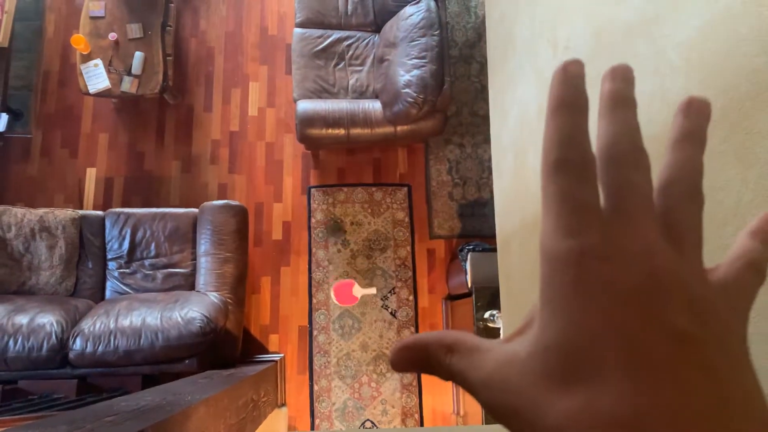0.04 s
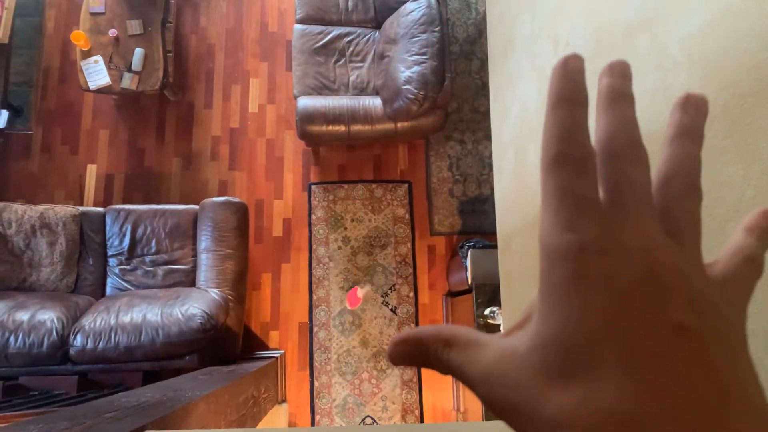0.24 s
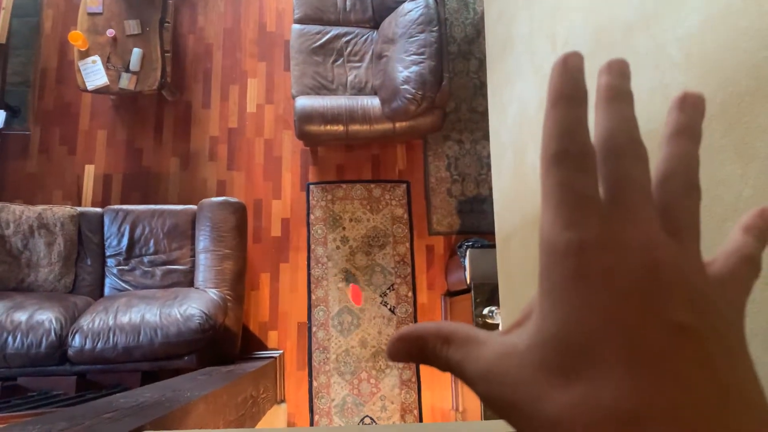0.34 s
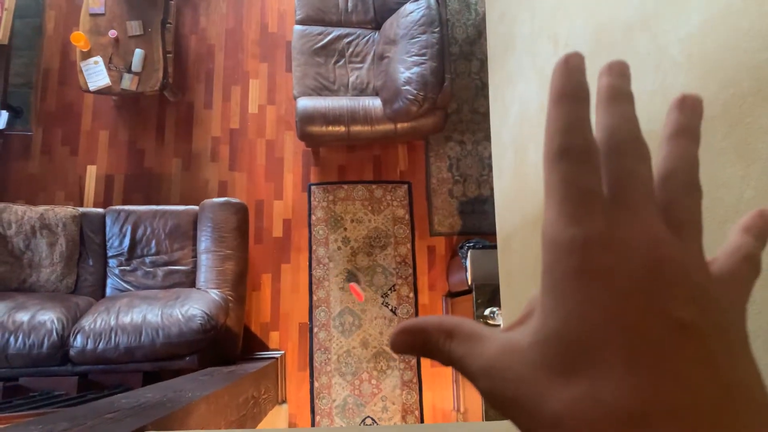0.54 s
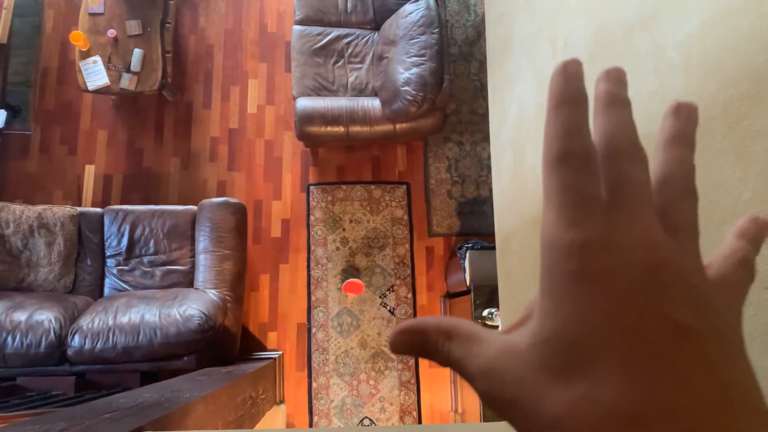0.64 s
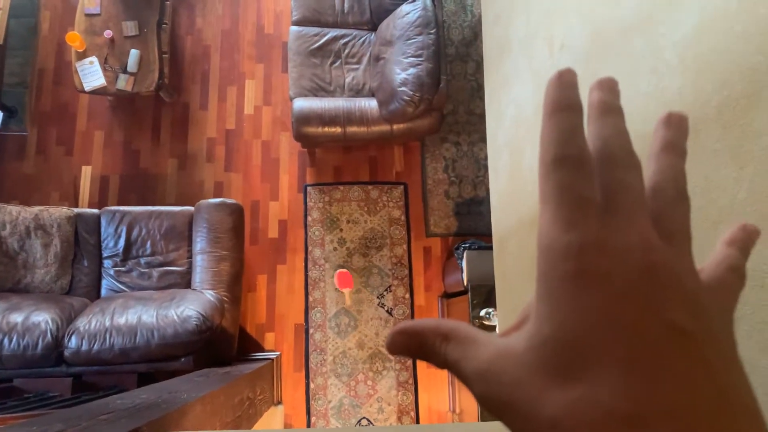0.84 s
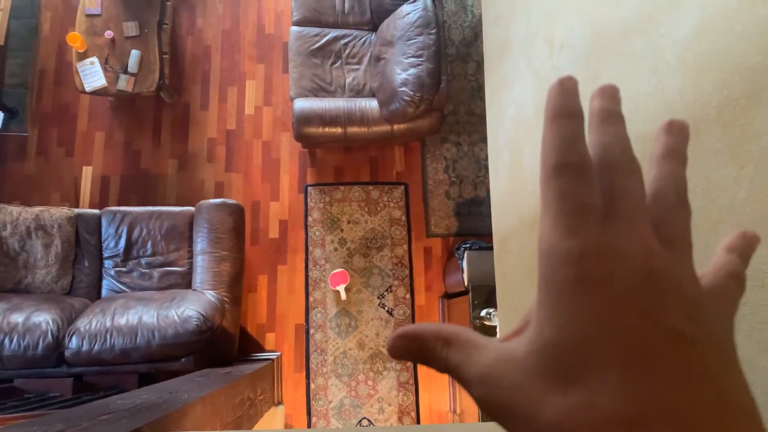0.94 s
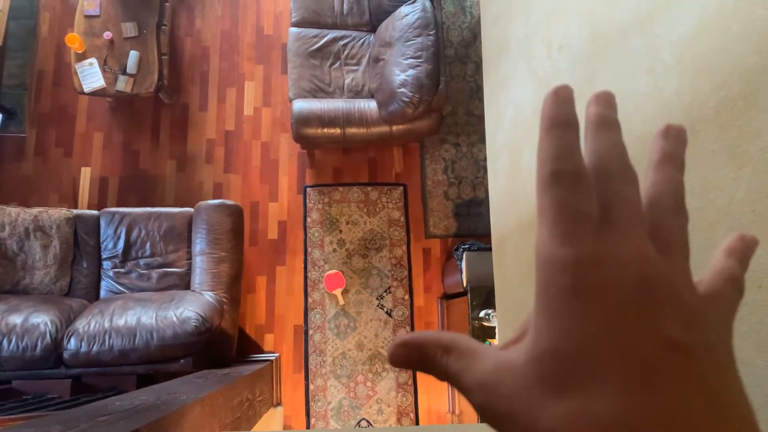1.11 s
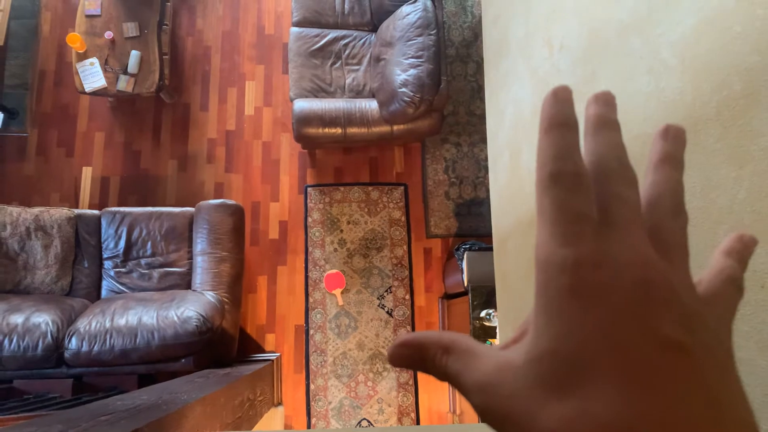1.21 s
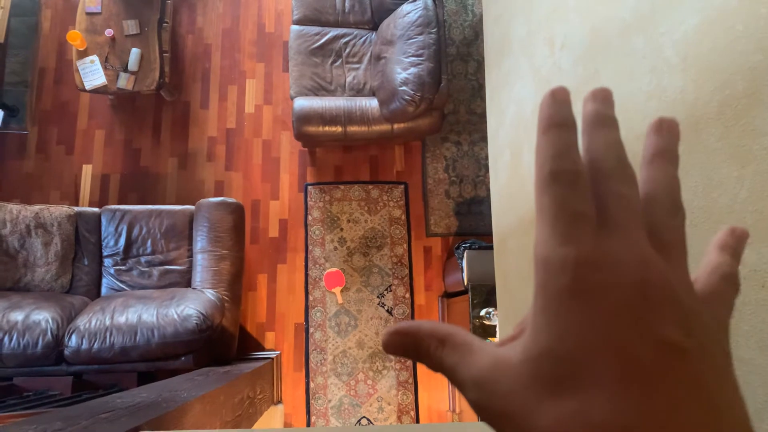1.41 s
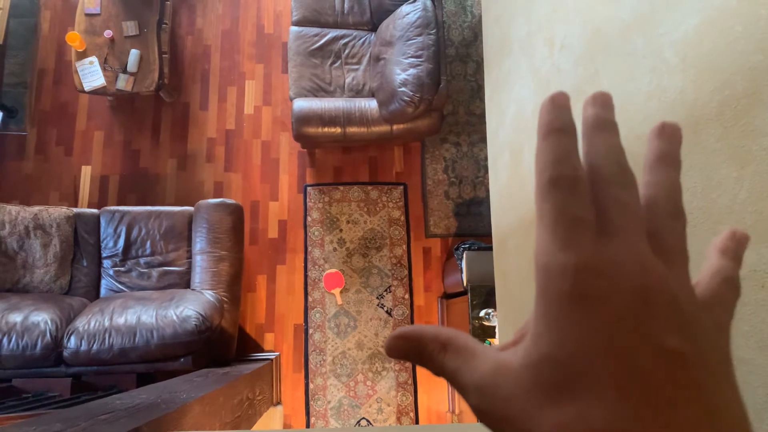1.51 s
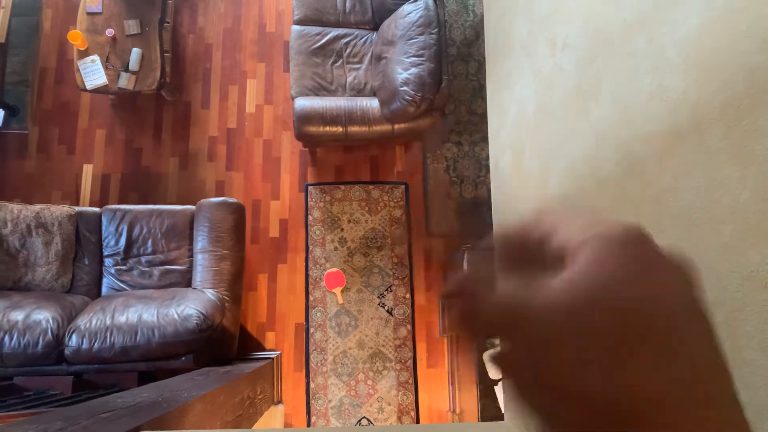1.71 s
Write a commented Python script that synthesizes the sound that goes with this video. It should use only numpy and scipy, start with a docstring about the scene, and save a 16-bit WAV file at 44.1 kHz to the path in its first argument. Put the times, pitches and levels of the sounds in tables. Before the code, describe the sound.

A wooden table-tennis paddle lands flat on a rug with a loud clack and a floor boom, hops twice on its edge and tips over. The microphone is high above, in an echoing room with a low hum.

```python
"""A low hum in a live room, then the slap of a wooden table-tennis paddle falling flat onto a rug.
From a microphone high above, the paddle is heard to hop twice on its edge and tip over. Each blow
rings its wooden modes with a rough clack, the wooden floor under the rug booms, and a few thin tones
ring on. Faint dry ticks sound close to the microphone."""
import sys
import numpy as np
from scipy import signal
from scipy.fft import rfft, irfft, next_fast_len
from scipy.io import wavfile

SR = 44100
rng = np.random.default_rng(int(sys.argv[2]) if len(sys.argv) > 2 else 0)


def store_pcm(level_fs):
    """Save levels as 16-bit WAV."""
    pcm = np.round(np.clip(level_fs, -1, 1) * 32767).astype(np.int16)
    wavfile.write(sys.argv[1], SR, np.atleast_2d(pcm).T)


N = 77175


def amp(db):
    return 10 ** (np.asarray(db) / 20)


def unit_rms(x):
    return x / np.sqrt(np.mean(x ** 2) + 1e-20)


def along(points, hz):
    """Curve through (f/Hz, value) points on a log frequency axis."""
    freqs, values = np.transpose(points)
    return np.interp(np.log(hz + 1), np.log(freqs + 1), values)


def fade(t, t60):
    """Falls 60 dB in t60 seconds."""
    return np.exp(-np.log(1000) * t / t60)


def swell(t, rise_s):
    """Rises from silence at t = 0 towards 1."""
    return 1 - np.exp(-np.maximum(t, 0) / rise_s)


def clock():
    return np.arange(N) / SR


def delayed(x, seconds):
    return np.pad(x, (max(round(seconds * SR), 0), 0))[:N]


def filtered(x, response):
    """x weighted by a gain that depends on frequency."""
    size = next_fast_len(N + SR // 2)
    hz = np.fft.rfftfreq(size, 1 / SR)
    return irfft(rfft(x, size) * response(hz), size)[:N]


def cut(x, hz, side, order):
    """Causal low-pass or high-pass."""
    return signal.sosfilt(signal.butter(order, hz, side, fs=SR, output="sos"), x)


def noise(spectrum):
    """Coloured noise of rms 1."""
    return unit_rms(filtered(rng.standard_normal(N), lambda hz: amp(along(spectrum, hz))))


def pulse(spectrum):
    """The most compact causal click with this spectrum (minimum phase)."""
    size = 4096
    gain = amp(along(spectrum, np.fft.rfftfreq(size, 1 / SR)))
    cepstrum = irfft(np.log(gain))
    cepstrum[1:size // 2] *= 2
    cepstrum[size // 2 + 1:] = 0
    return np.pad(irfft(np.exp(rfft(cepstrum))), (0, N - size))


def ringing(modes):
    """Sum of struck modes, each a decaying sine."""
    out = np.zeros(N)
    for hz, db, t60 in modes:
        t = clock()[:int(2 * t60 * SR)]
        out[:len(t)] += amp(db) * fade(t, t60) * np.sin(2 * np.pi * hz * t)
    return out


def blooming(modes):
    """Sum of modes that take a while to build up."""
    return sum(swell(clock(), rise_s) * ringing([(hz, db, t60)]) for hz, db, rise_s, t60 in modes)


# room tone at the microphone (f/Hz, relative level/dB)
ROOM_TONE = [(25, 6), (60, -7.5), (130, -6), (200, -10), (350, -8), (500, -18), (900, -25), (1500, -34),
             (4000, -32), (8000, -43.5), (15500, -44.5)]


def background(air_db=-62, hum_hz=122, hum_db=-62.5):
    """Steady room tone and the hum of an appliance."""
    hum = unit_rms(np.sin(2 * np.pi * hum_hz * clock()))
    return amp(air_db) * noise(ROOM_TONE) + amp(hum_db) * hum


# reverberation time of the room (f/Hz, t60/s)
ROOM_DECAY = [(100, 0.32), (300, 0.23), (600, .62), (1000, 0.56), (2000, 0.66), (4000, 0.58), (7000, 0.36),
              (12000, 0.24)]


def room(x, delay_s=0.0017, hold_s=0.066):
    """The room's diffuse answer builds up, holds while the walls trade echoes, then dies band by band."""
    hz, t, bands = signal.stft(rng.standard_normal(N), SR, nperseg=256)
    decay = fade(np.maximum(t - hold_s, 0), along(ROOM_DECAY, hz)[:, None])
    tail = signal.istft(bands * decay, SR, nperseg=256)[1][:N]
    tail *= swell(clock() - delay_s, rise_s=0.0058)
    return signal.fftconvolve(x, tail / np.linalg.norm(tail))[:N]


# ticks close to the microphone (t/s, level/dB, pitch ratio)
NEAR_TICKS = [(.527, -57.5, 0.79), (.596, -50.5, 0.77), (.68, -64, 1.3), (0.828, -63, 1.15),
              (0.965, -59, 1.12), (1.036, -64.5, 1.27), (1.262, -58.5, 0.93), (1.416, -62.5, .99)]
# spectrum of a tick's scratch (f/Hz, relative level/dB)
SCRATCH_SPECTRUM = [(500, -12), (1500, 6.5), (3000, -2), (4500, 4), (6000, -5.5), (7500, 2), (10000, -23.5),
                    (15000, -21.5)]
# a tick's modes at pitch ratio 1 (f/Hz, relative level/dB, t60/s)
PING_MODES = [(2490, -5, 0.025), (3812, -5.5, 0.055)]


def ticks(room_db=-1):
    """Faint bright ticks close by: each a short scratch and two small modes, with the room behind."""
    t, close = clock(), np.zeros(N)
    for start, db, ratio in NEAR_TICKS:
        scratch = swell(t, rise_s=0.0018) * fade(t, t60=0.045) * noise(SCRATCH_SPECTRUM)
        ping = ringing([(hz * ratio, level, t60) for hz, level, t60 in PING_MODES])
        close += delayed(amp(db) * (scratch + ping), start)
    return close + amp(room_db) * room(close)


# wooden floor under the rug (f/Hz, relative level/dB, rise/s, t60/s)
FLOOR_MODES = [(161.7, -1.5, 0.005, 0.28), (189.7, -0.5, 0.004, 0.21)]
# spectrum of the room's boom (f/Hz, relative level/dB)
BOOM_SPECTRUM = [(25, -33.5), (45, -15.5), (70, -3), (100, 2), (180, -5.5), (245, -10), (320, -8),
                 (450, -10.5), (900, -56), (2500, -120)]
# slow low modes of the room (f/Hz, relative level/dB, rise/s, t60/s)
BASS_MODES = [(80, -2.5, 0.1, 0.39), (105, -2.5, .05, 0.2)]


def floor_thump(boom_db=-3.5):
    """The floor gives under the blow, and the room's bass blooms a moment later."""
    t = clock()
    boom = amp(boom_db) * swell(t, rise_s=0.0083) * fade(t, t60=0.68) * noise(BOOM_SPECTRUM)
    return blooming(FLOOR_MODES) + delayed(boom + blooming(BASS_MODES), seconds=0.015)


# the paddle's rim strikes the rug during the hops (t/s, level/dB)
RIM_LANDINGS = [(.5955, -25), (.8285, -23.5), (1.127, -42)]
# modes of the paddle struck on its rim (f/Hz, relative level/dB, t60/s)
RIM_MODES = [(545, -5, 0.027), (704, -4, 0.013)]


def rim_knocks(soft_hz=940):
    """Short hollow knocks of the paddle landing on its edge."""
    knock = cut(ringing(RIM_MODES), soft_hz, "low", order=3)
    return sum(delayed(amp(db) * knock, start) for start, db in RIM_LANDINGS)


# modes of the paddle, damped by the rug (f/Hz, relative level/dB, t60/s)
WOOD_MODES = [(590.3, -11.5, 0.038), (719.6, -15, 0.035), (820, -8, .04), (1059.7, -5.5, 0.085),
              (1095.5, -19.5, 0.018), (1303, -18.5, 0.014), (1594, -26, .03), (1930, -10.5, 0.049),
              (2194, -13, 0.031), (3637, -21.5, 0.031)]
# broad clack of the blow (f/Hz, relative level/dB)
CLACK_SPECTRUM = [(100, -11), (250, 1), (450, 9), (1200, 10), (2500, -4.5), (4000, -13.5), (6000, -22),
                  (8000, -28.5), (11000, -37), (15500, -39.5)]


def paddle_blow(clack_db=20, direct_top_hz=4884, room_db=-0.5):
    """Wooden modes and a rough clack reach the microphone overhead, directly and through the room."""
    wood = ringing(WOOD_MODES)
    clack = amp(clack_db) * pulse(CLACK_SPECTRUM)
    t = clock()[:SR // 20]
    roughness = rng.standard_normal(len(t)) * fade(t, t60=0.021)
    rough_clack = signal.fftconvolve(clack, roughness / np.linalg.norm(roughness))[:N]
    direct = cut(wood + rough_clack, direct_top_hz, "low", order=3)
    return direct + amp(room_db) * (room(wood) + room(clack))


# thin tones that ring on after the blows (f/Hz, relative level/dB, t60/s)
LINGERING_TONES = [(353.5, 0, 1.25), (812, -5, .85), (1074, -3, .65), (1905, -13, .7)]
# paddle meets rug, far below the microphone
# (t/s, blow level/dB, lowest excited f/Hz, highest excited f/Hz, thump level/dB, ring level/dB)
RUG_CONTACTS = [(0.2015, -17.5, 471.4, 1274, -74.5, -63), (0.2083, -12, 390, 1706, -41, -80.5),
                (.2122, -4, 327, 1550, -24, -74), (.2153, -1.5, 448, 8330, -59.5, -27),
                (.2183, -2.5, 444, 1487, -38, -74.5), (.5925, -21.5, 430, 670, -31, -34.5),
                (.827, -20.5, 330, 655, -32.5, -41.5), (0.961, -39, 1105, 1420, -42, -66.5),
                (1.074, -45, 196, 990, -42.5, -62.5), (1.1275, -28.5, 620, 882, -41.5, -49.5),
                (1.160, -38.5, 940, 930, -51, -51.5), (1.236, -54, 1023, 1220, -64, -93)]


def paddle_drop():
    """Every contact sounds the paddle, the floor and the lingering tones; soft contacts are dull."""
    blow, thump, tones = paddle_blow(), floor_thump(), ringing(LINGERING_TONES)
    out = np.zeros(N)
    for start, blow_db, low_hz, high_hz, thump_db, ring_db in RUG_CONTACTS:
        knock = cut(blow, low_hz, "high", order=2)
        knock = cut(knock, high_hz, "low", order=4)
        ring = cut(tones, high_hz, "low", order=3)
        out += delayed(amp(blow_db) * knock + amp(thump_db) * thump + amp(ring_db) * ring, start)
    return out


def scene():
    """The room as it reaches one microphone high above the rug."""
    return (paddle_drop() + rim_knocks() + ticks() + background())[None]


def record(dry):
    """The recorder rounds off the highest peaks and drops the deepest bass and the highest treble."""
    low_cut_hz, top_hz = 50, 15700
    rounded = dry[0] / (1 + np.abs(dry[0]) ** 6) ** (1 / 6)
    trimmed = cut(rounded, low_cut_hz, "high", order=2)
    return filtered(trimmed, lambda hz: hz < top_hz)[None]


dry = scene()
out = record(dry)
store_pcm(out)
```